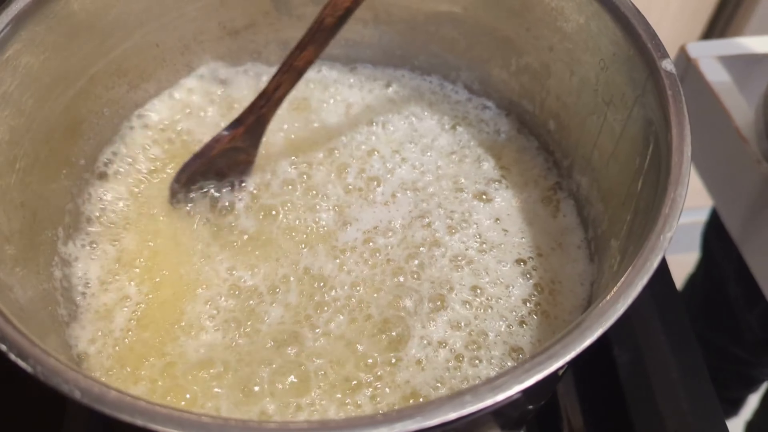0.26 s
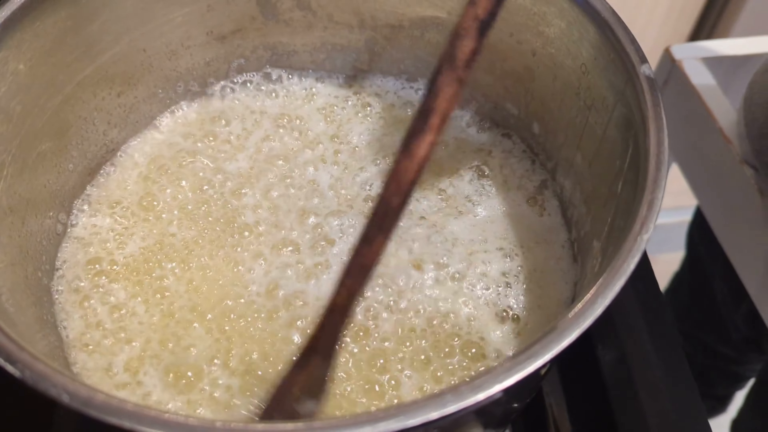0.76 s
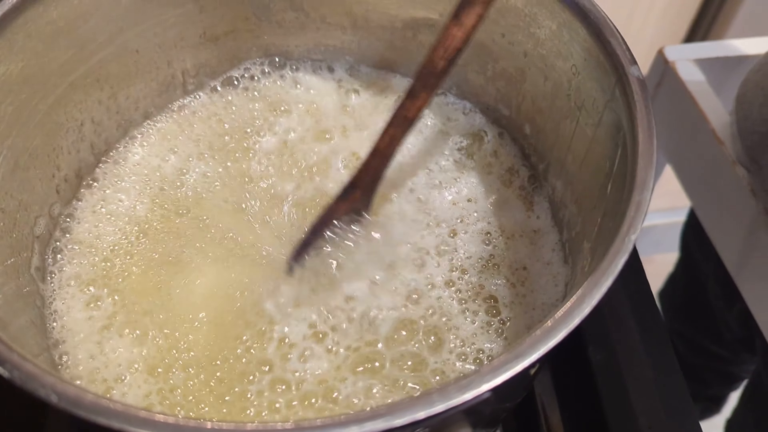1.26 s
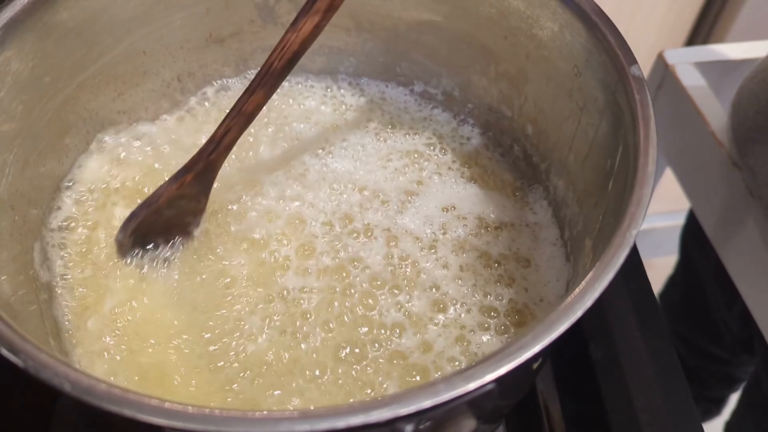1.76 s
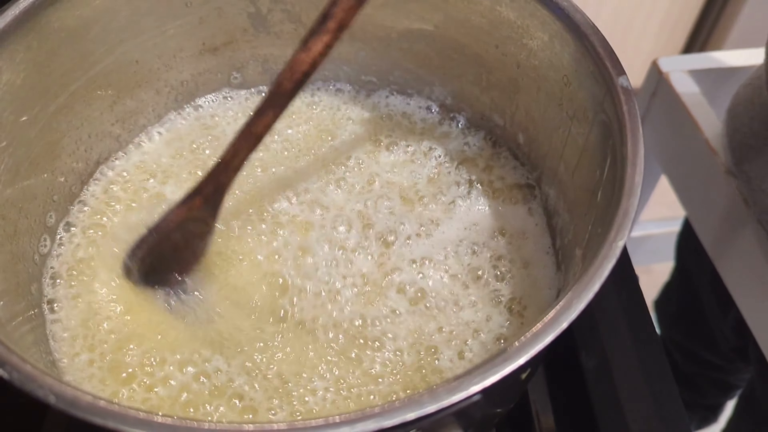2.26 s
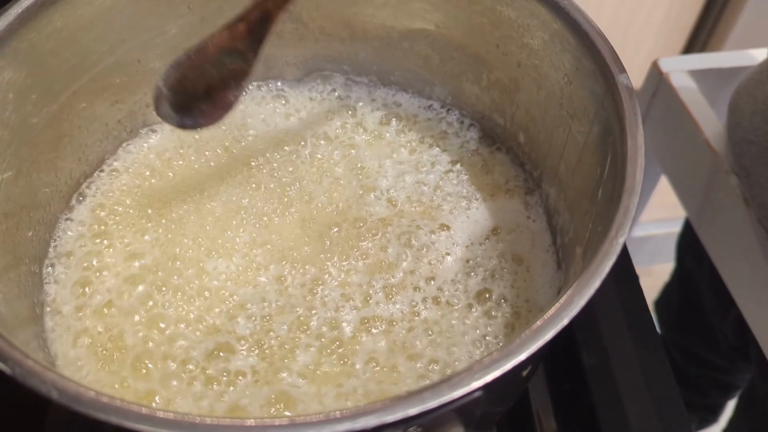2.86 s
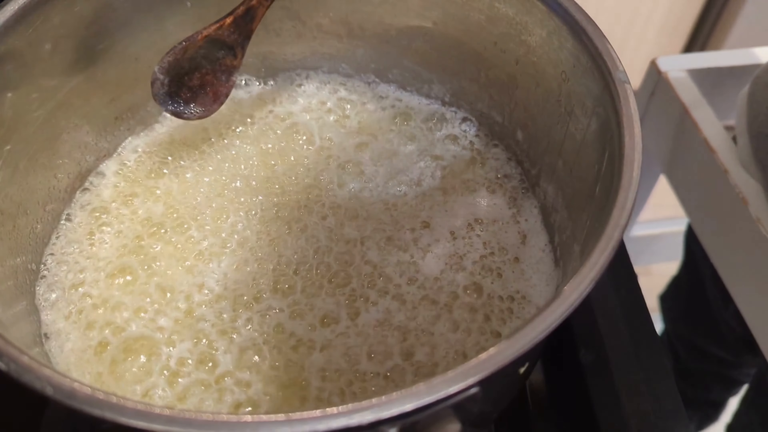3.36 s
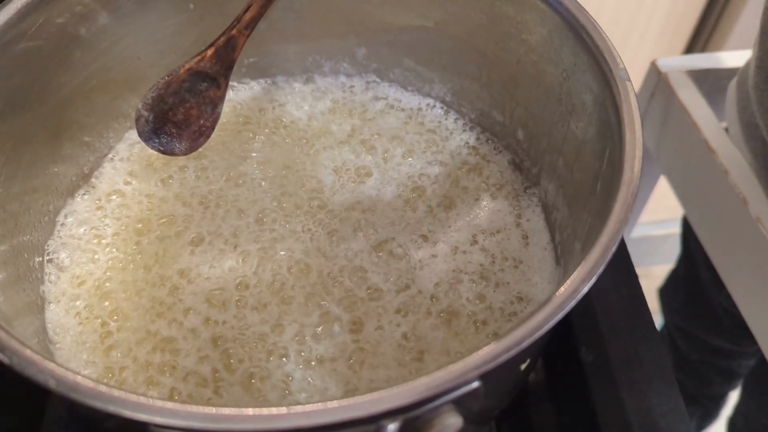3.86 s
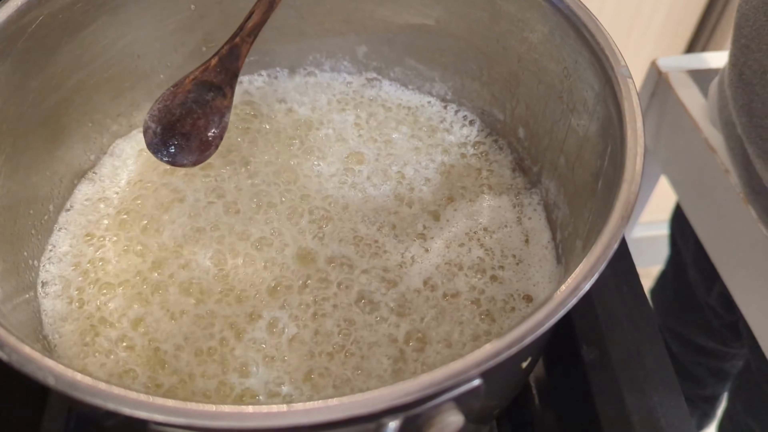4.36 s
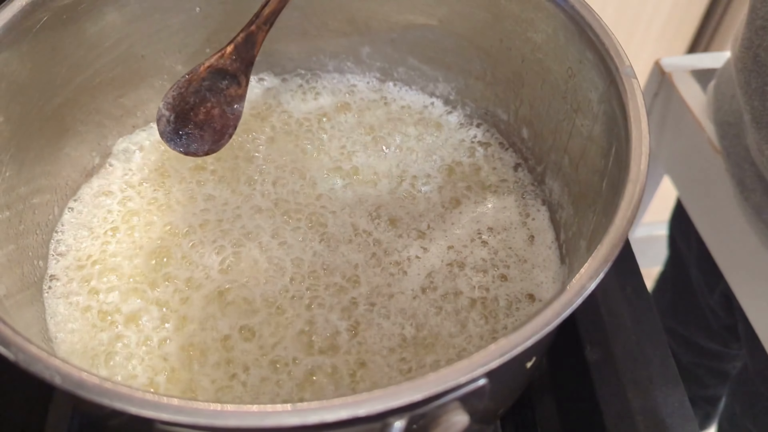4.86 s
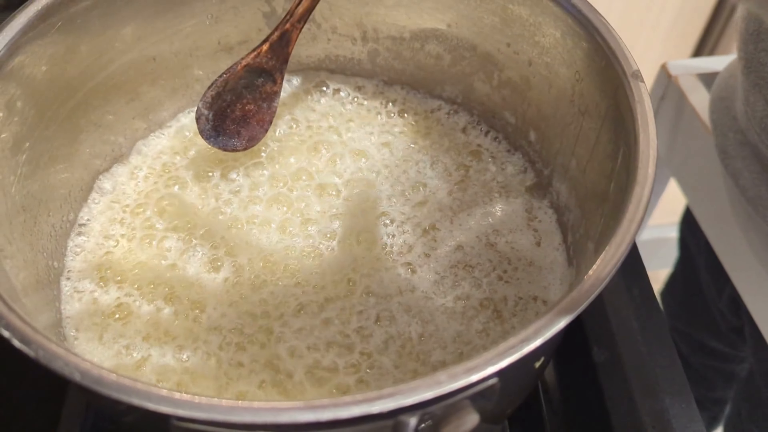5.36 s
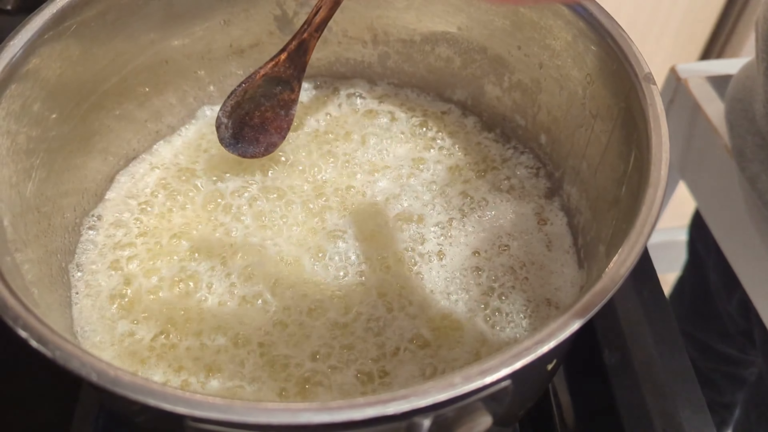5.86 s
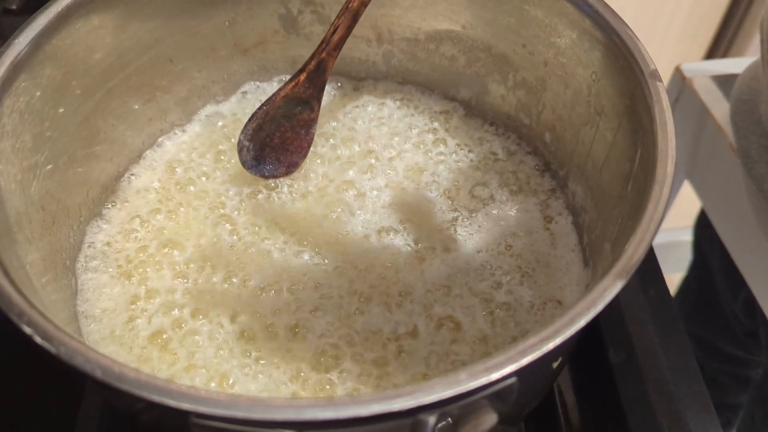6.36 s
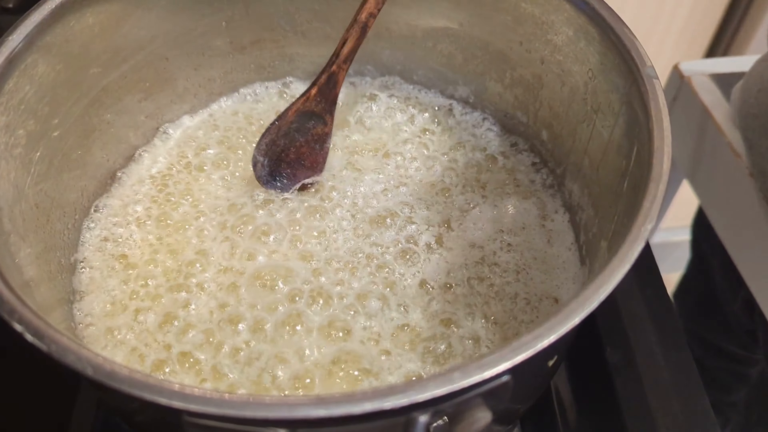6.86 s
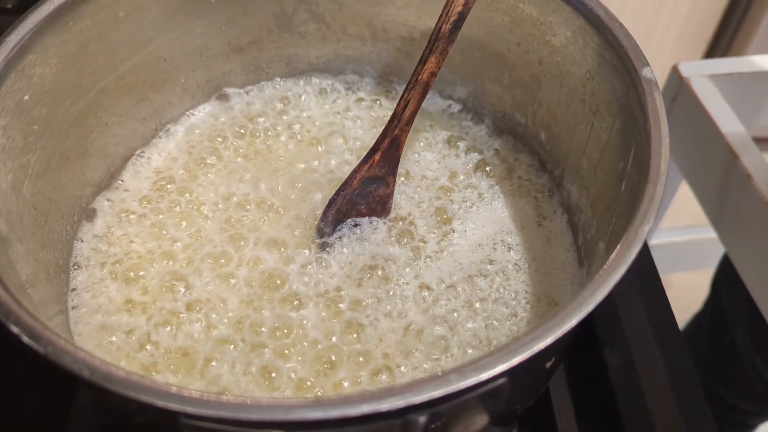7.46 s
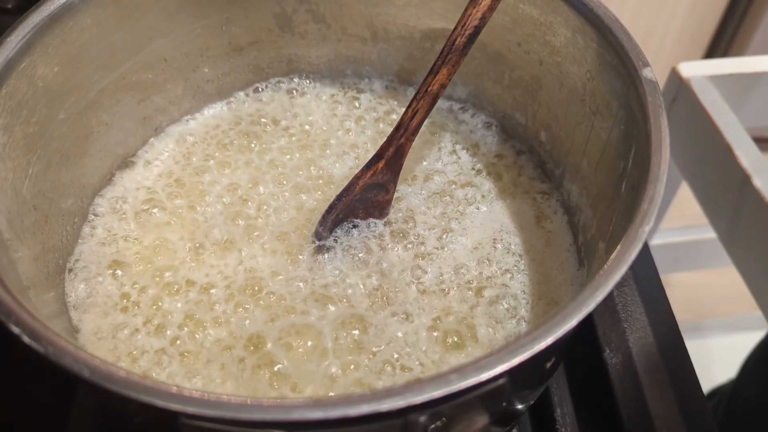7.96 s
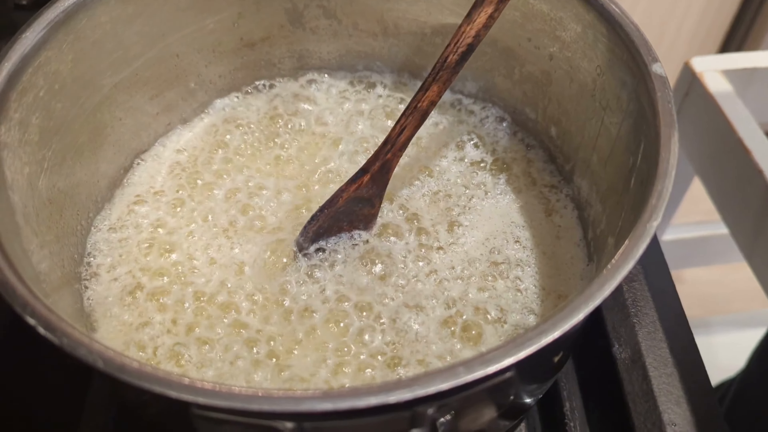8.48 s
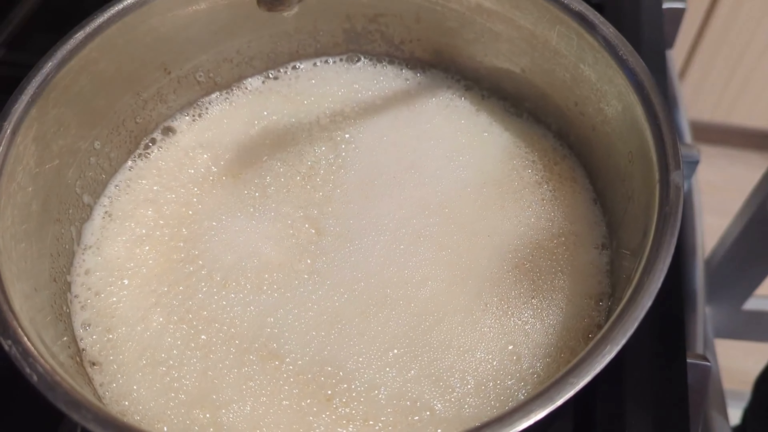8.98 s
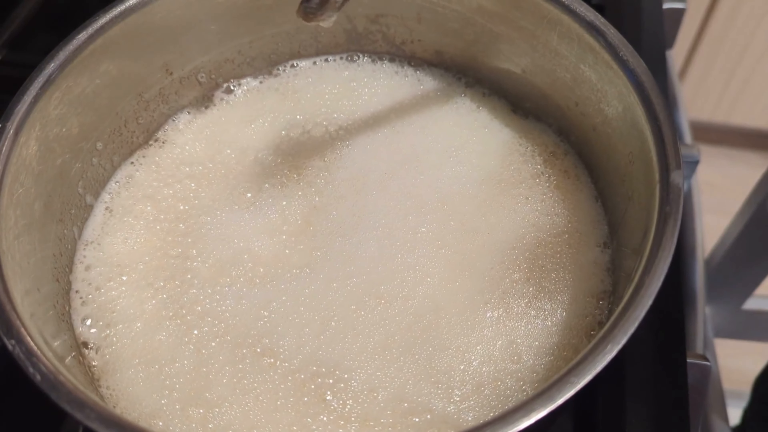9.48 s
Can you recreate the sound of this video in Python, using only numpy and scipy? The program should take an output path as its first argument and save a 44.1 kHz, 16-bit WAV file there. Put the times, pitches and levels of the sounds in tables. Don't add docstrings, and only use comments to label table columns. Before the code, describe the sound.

After a tiny silent start, boiling butter enters at once: a dense, bright sizzle of countless bursting bubbles, close above a deep steel pot that gives the mids a hollow ring. From 0 to 2.8 s spoon strokes make the hiss surge and splash, with sharp high snaps and wet bubble blips. Around 3.0 to 3.4 s come spits of hot fat and soft spoon knocks on metal. The rolling boil then continues fuller and bubblier, with a strong crackling spit at 4.15 s, scattered pops and plopping bubbles, and another dull knock at 7.6 s. Crackle thickens toward 8.6 s. Sound cuts nearly silent at 8.63 s, with a brief scrap, then resumes at 8.78 s as much quieter, soft foam fizz with fine ticks, a clearer one at 9.44 s and a small spit at 9.48 s. A low, slightly wavering extractor hum near 120 Hz and duct rumble underlie both scenes.

```python
import sys
import numpy as np
from scipy import signal
from scipy.fft import rfft, irfft
from scipy.io import wavfile
from scipy.ndimage import uniform_filter1d

SR = 44100
rng = np.random.default_rng(int(sys.argv[2]) if len(sys.argv) > 2 else 0)


def int16_out(signal):
    q = np.round(np.clip(np.atleast_2d(signal).T, -1, 1) * 32767)
    wavfile.write(sys.argv[1], SR, q.astype(np.int16))


def rack_gain(trim_db):
    fader = np.asarray(trim_db, float)
    return 10 ** (fader / 20)


N = 428644
T = np.arange(N) / SR
HZ = np.maximum(np.arange(N // 2 + 1) * SR / N, 1.)
CHANGE_S = 8.65
LEFT_RIGHT = np.array([[1], [-1]])

# time in seconds, boil of the large bubbles in dB, fine spray from the spoon in dB.
BOIL = [
    [(.07, -8, 6.5), (.25, -6.5, 6), (.5, -5.5, 9), (.9, -3.5, 5), (1.3, -5.5, 13), (1.55, -3, 9),
     (1.8, -6, 11.5), (2.2, 0, 2.5), (2.75, -3, 8), (3.2, 0.5, -1.5), (4.4, 0.5, -0.5), (5.5, 1, -2),
     (7.5, 1, -1), (8.64, 2, -1.5)],
    [(8.652, -23, 1.5), (8.85, -20, -7.5), (9.24, -17, -5.5), (9.72, -13, -8)],
]
BUBBLE_HZ = (750, 1900, 5500, 13000)
# frequency in Hz, level in dB per Hz.
SIZZLE = [(300, -9.5), (600, -13), (900, -16.5), (1150, -17), (1500, -4.5), (2500, -9), (3200, -9.5),
          (4200, -10.5), (5500, -16), (7000, -13), (8100, -17), (9000, -15), (13000, -13.5), (15800, -17.5)]
# frequency in Hz, width in Hz, level in dB.
POT_AIR = [(945, 18, 1.5), (1274, 55, 14.5), (1380, 18, -7), (1930, 67, 6), (2550, 740, -2),
           (3700, 100, -45.5)]
# frequency in Hz, level in dB per Hz.
FOAM = [(300, -6.5), (600, -13), (1000, -10.5), (1600, -8), (2500, -3.5), (3500, -10.5), (5000, -14.5),
        (7000, -11.5), (10000, -13), (13000, -10), (15500, -15)]


def butter():
    boil_db, spray_db = curves(BOIL)
    levels = np.outer((0.31, 0.93, 0.94, 0.85), boil_db) + np.outer((0.053, 0, 0.5, 0.92), spray_db)
    out = np.zeros((2, N))
    slow_surge = walk(11)
    crackle = walk(100)
    for hz in 350 * 2 ** np.arange(0, 5.7, 1 / 3):
        place = np.interp(np.log(hz), np.log(BUBBLE_HZ), np.arange(4))
        low = min(int(place), 2)
        small = np.clip(np.log2(hz / 1500) / 3, 0, 1)
        db = levels[low] + (place - low) * (levels[low + 1] - levels[low])
        db = db + surges(hz) + 0.6 * slow_surge
        db = db + (3.8 + .14 * spray_db) * small ** 3 * crackle
        db = db + (2.3 - 1.1 * small) * walk(35)
        burst = rng.random((2, N)) < hz * (.2 + .4 * small) / SR
        rarity = np.minimum(rng.exponential(size=(2, N)), 3.5)
        size = rack_gain((2.0 + 1.0 * small) * rarity) * rng.choice([-1., 1.], size=(2, N))
        rung = ring(ring(burst * size, hz, 0.32 * hz), hz, 0.37 * hz)
        out += rack_gain(db) * unit(rung) * np.sqrt(hz)
    out = np.where(T < CHANGE_S, colour(out, SIZZLE, POT_AIR), colour(out, FOAM, []))
    return ports(*unit(out)) * rack_gain(-36)


# time of the peak in seconds, change of level in dB,
# pitch in Hz, fade in seconds.
SURGES = [(4.17, 5, 900, .08), (8.55, 3, 4500, .1), (.14, 4.5, 2200, 0.025), (.3, 8.5, 750, 0.17),
          (.33, 11, 13300, 0.066), (1.05, 2.5, 9000, .08), (1.12, 3.5, 750, 0.25), (1.35, -1, 13000, 0.042),
          (1.43, 4, 900, 0.05), (1.78, 4.5, 2510, .1), (1.86, -1.5, 13000, 0.1), (2.18, 6.5, 1000, 0.07),
          (3.0, -6, 13000, .02), (3.06, 10.5, 4500, 0.1), (3.1, 4, 1200, 0.045), (3.26, 18, 7050, 0.066),
          (3.39, 8, 694, 0.097), (4.17, 19, 7600, 0.09), (4.19, 1, 2500, 0.087), (4.76, 5, 1900, .06),
          (4.91, 9, 550, .07), (5.14, 6, 800, 0.057), (6.28, 1.5, 11000, .04), (6.89, 4.5, 2000, 0.036),
          (7.605, 10, 600, .05), (7.67, 2, 2000, 0.017), (7.84, 3.5, 750, .06), (9.51, 5, 6000, .08),
          (1.28, 3, 2000, .07), (8.8, -3.5, 700, .4), (8.67, 13, 12000, .01), (9.7, 8, 1000, 0.084),
          (.34, 0, 11000, .06), (.42, 4, 11000, .03), (.5, 3, 12000, 0.14), (.46, -6, 10000, .02),
          (.83, -1, 11000, .03), (1.13, 3, 13000, 0.11), (1.3, 2.5, 13000, 0.053), (8.3, -3, 12000, .3),
          (5.65, 1.5, 1100, .2), (7.33, 3, 1500, 0.22), (5.14, 6, 400, .15), (.1, -3, 6000, 0.1),
          (1.55, -3, 12000, .15), (8.58, 1, 1100, .1), (3.05, 4, 9000, .06), (4.76, 2.5, 800, .08),
          (8.58, -3, 2200, .1), (5.4, 3, 11000, .1), (8.0, -2, 9000, .1), (4.3, -2, 2200, .1)]


def surges(hz):
    rise_s, octaves = 0.027, 0.86
    db = np.zeros(N)
    for s, peak_db, centre_hz, fade_s in SURGES:
        near = slice(int((s - .1) * SR), int((s + .6) * SR))
        age = T[near] - s
        fall = np.where(age < 0, (age / rise_s) ** 2, age / fade_s)
        db[near] += peak_db * np.exp(-(np.log2(hz / centre_hz) / octaves) ** 2 - fall)
    return db


# start in seconds, peak in dB, pitch in Hz.
POPS = [(.3109, -18, 13700), (.4126, -21, 13200), (.7953, -22, 8810), (1.0437, -19, 12500),
        (1.3844, -13, 13000), (1.6388, -22, 9460), (1.8803, -19, 13100), (2.1746, -17, 11200),
        (2.223, -14, 14900), (2.4934, -24, 13100), (2.5572, -21, 6900), (2.654, -18, 11200),
        (2.7932, -17, 12900), (2.984, -11, 15000), (4.326, -26, 10000), (3.8408, -24, 6870),
        (3.931, -19, 7950), (4.16, -22, 8840), (4.17, -15, 9000), (4.1733, -19, 7000), (4.198, -20, 8000),
        (1.054, -19, 8000), (.86, -28, 7000), (4.9994, -19.5, 8900), (5.7744, -17, 12800),
        (6.0408, -21, 12700), (6.2843, -20, 12500), (6.836, -23, 11800), (7.1588, -28, 7400),
        (5.659, -23, 9740), (7.8424, -18, 9700), (7.935, -20, 11300), (8.0343, -28, 11900),
        (8.171, -21, 13100), (8.4373, -14.5, 10800)]
# start in seconds, peak in dB, pitch in Hz.
TICKS = [(8.9201, -41, 12700), (8.9924, -40, 14400), (9.0388, -33, 13500), (9.0832, -34, 11700),
         (9.1305, -27, 9900), (8.9723, -47, 11300), (9.2897, -44, 8020), (9.3626, -44, 6030),
         (9.436, -20, 12630), (9.213, -44, 6000), (9.302, -42, 13000), (9.489, -38, 8000),
         (9.552, -42, 11000), (9.63, -42, 7000), (9.717, -40, 9000)]


def pops():
    low_hz, high_hz = 8400, 15000
    snaps = [(s, db, low_hz + draw * (high_hz - low_hz))
             for s, db, draw in chance_bursts(per_s=90, db=-32.5, spray_share=0.78)]
    out, t = np.zeros(N + 4096), T[:4096]
    for s, db, hz in POPS + TICKS + snaps:
        level = rack_gain(db + 1.2 - 60 * t * hz / 12.)
        out[int(s * SR):][:4096] += level * np.minimum(t * hz / 1.2, 1) * np.sin(2 * np.pi * hz * t)
    out = out[:N]
    echoes = np.array([pot_echo(.02), pot_echo(0.031)])
    return out + .45 * signal.fftconvolve(out[None], echoes, axes=1)[:, :N]


# start in seconds,
# peak in dB, pitch in Hz.
GULPS = [(0.1268, -33, 2340), (0.537, -38, 2340), (0.7637, -32, 2350), (0.8486, -36, 2380),
         (1.2336, -32, 1320), (1.3245, -32.5, 1434), (1.4313, -38, 2410), (1.5091, -38, 1970),
         (1.7597, -29, 2340), (1.9062, -33, 2440), (2.3343, -28, 2000), (2.4295, -28.5, 1910),
         (2.7299, -31.5, 1630), (2.878, -32, 1930), (2.9838, -35.5, 2490), (3.0368, -33, 1950),
         (3.366, -23, 1960), (3.4505, -36, 1215), (3.553, -31, 2390), (3.832, -34, 1900),
         (4.3352, -30.5, 2200), (4.4749, -33.5, 2350), (4.5477, -30, 1680), (4.7458, -25, 1275),
         (5.0887, -32.5, 1254), (5.2666, -34.5, 1270), (5.4417, -30, 1994), (5.592, -34, 1280),
         (5.743, -37, 1320), (6.3691, -34, 1280), (6.4744, -29.5, 1930), (6.666, -31.5, 1900),
         (6.6874, -27, 1440), (6.7806, -30, 1930), (6.8919, -27, 2120), (7.269, -29, 2420),
         (7.3164, -32, 2500), (7.3405, -31, 2340), (7.416, -30, 1270), (7.4626, -30, 1920),
         (7.4975, -31, 2100), (7.6606, -30.5, 1856), (7.9101, -33, 1800), (8.251, -30, 1920),
         (8.353, -32, 1930), (8.394, -29, 2450), (8.4808, -31, 1300), (8.556, -34, 2280),
         (8.5885, -31, 2340),
         (.085, -35.5, 2420), (1.151, -32, 1660), (1.166, -35, 1490), (1.244, -35, 1390),
        (1.2565, -32, 1900), (1.277, -37, 1930), (1.288, -38, 1900), (1.303, -34, 1850),
        (1.319, -33.5, 2460), (1.4, -37, 2350), (1.51, -34, 1690), (6.896, -29, 1660), (7.672, -31, 2300),
         (1.775, -31, 2400), (1.787, -33, 2420), (1.44, -35, 2420), (1.455, -35, 2400),
            (1.655, -34, 2350), (3.07, -33, 2700), (3.11, -33, 1950), (3.127, -31, 2250), (3.12, -34, 1300),
            (4.165, -31, 2300), (4.175, -31, 2200), (4.182, -29, 1240), (4.19, -30, 2550),
            (4.158, -31, 3250), (4.173, -31, 3700), (4.25, -33, 1900), (6.956, -33, 2050),
            (7.146, -32, 1940), (7.19, -33, 2390), (7.234, -32, 2360), (7.408, -29, 1850),
            (7.41, -33, 2600), (7.54, -33, 2310), (7.672, -30, 1850), (7.744, -33, 2430),
            (7.845, -34, 1950), (7.972, -30, 1280), (8.148, -34, 1930), (8.157, -33, 1950),
            (8.184, -35, 1790), (8.292, -33, 2150), (8.392, -29, 1710), (8.432, -30, 2480),
            (8.537, -34, 1900), (8.556, -31, 1920), (8.575, -30, 1280)]


def gulps():
    blips = [(s, db, POT_AIR[(1, 3, 4)[int(3 * draw)]][0])
             for s, db, draw in chance_bursts(per_s=3, db=-43, spray_share=.01) if s < CHANGE_S]
    rows = GULPS + blips
    return in_pot(notes(rows, gain_db=-6, rise_s=.004, t60=.058, rough=.6, glide_per_s=.6, bass=.1))


# start in seconds, peak in dB, pitch in Hz.
KNOCKS = [(3.047, -35, 960), (3.062, -39, 960), (3.1, -35, 660), (3.366, -29, 1270), (3.366, -34, 2280),
          (3.372, -32, 430), (3.41, -34, 425), (3.44, -39, 410), (3.367, -39, 770), (3.425, -40, 750),
          (3.427, -40, 1280), (7.589, -33, 400), (7.589, -28.5, 667), (7.6, -35, 969)]


def knocks():
    return in_pot(notes(KNOCKS, gain_db=-2.5, rise_s=.003, t60=0.06, rough=0.3, glide_per_s=0, bass=.8))


def notes(rows, gain_db, rise_s, t60, rough, glide_per_s, bass):
    out, t = np.zeros(N + 4096), T[:4096]
    for s, db, hz in rows:
        wobble = rough * unit(ring(ring(rng.standard_normal(4096), hz, 340), hz, 340))
        tone = wobble + np.sin(2 * np.pi * hz * t * (1 + glide_per_s * t))
        fall_db = 60 * np.maximum(t - rise_s, 0) / t60 * (hz / 1000) ** bass
        out[int(s * SR):][:4096] += rack_gain(db + gain_db - fall_db) * np.minimum(t / rise_s, 1) * tone
    return out[:N]


def in_pot(x):
    return x + 0.9 * signal.fftconvolve(x, pot_echo(0.037))[:N] * LEFT_RIGHT


def pot_echo(t60):
    echo = rng.standard_normal(4096) * rack_gain(-60 * T[:4096] / t60)
    return echo / np.sqrt(np.sum(echo ** 2))


def chance_bursts(per_s, db, spray_share):
    place, size, draw = rng.random((int(per_s * N / SR), 3)).T
    boil_db, spray_db = (c[(place * N).astype(int)] for c in curves(BOIL))
    peak_db = db + boil_db + spray_share * spray_db - 3 * np.log(size + .02)
    return zip(place * N / SR, peak_db, draw)


# start in seconds, level in dB, time to fall 60 dB in seconds, lowest and highest Hz.
SPITS = [(1.15, -45, .1, 1400, 2200), (1.23, -46.5, 0.18, 60, 400), (2.09, -44.5, 0.82, 506, 1600),
         (3.035, -37, 0.93, 800, 8200), (3.075, -38, .6, 500, 3500), (3.235, -29.5, 0.56, 3000, 12800),
         (3.385, -41, 0.22, 250, 1100), (4.15, -30, 0.55, 2400, 11000), (4.152, -40, .5, 700, 3200),
         (4.147, -29.5, 0.31, 6000, 12500), (4.19, -49, 0.18, 150, 400), (7.585, -35.5, 0.14, 300, 1200),
         (9.483, -42.5, 0.31, 3200, 14000)]


def spits():
    out = np.zeros((2, N))
    for s, db, t60, low_hz, high_hz in SPITS:
        age = np.maximum(T - s, 0)
        noise = rng.standard_normal((2, N)) * rack_gain(3.0 * walk(150))
        middle_hz = np.sqrt(low_hz * high_hz)
        for band, share in ((low_hz, middle_hz), 1.), ((middle_hz, high_hz), .6):
            hiss = signal.sosfilt(signal.butter(2, band, "band", fs=SR, output="sos"), noise)
            out += rack_gain(db - 60 * age / (t60 * share)) * np.minimum(age / 0.01, 1) * unit(hiss)
    return ports(*out)


# time in seconds, hum level in dB.
FAN = [
    [(0.07, -37), (0.11, -37.5), (0.28, -35), (0.57, -39), (0.71, -36.5), (1.21, -37.5), (1.28, -36),
     (7.97, -35), (8.14, -35), (8.43, -35.5), (8.6, -34.5), (8.62, -35.5)],
    [(8.785, -38.5), (8.847, -36.5), (9.275, -39), (9.591, -37.5), (9.72, -36)],
]
# frequency in Hz, level in dB, left minus right in dB, left lead in radians.
HUM = [(120, 1.5, 4.5, 0.29), (240.2, -19, -1, .2), (359.4, -15, -0.5, 0.82)]
# frequency in Hz, level in dB per Hz.
FAN_AIR = [(12, -80.5), (20, -43), (43, -14), (85, -13.5), (101, -11), (122, -13), (151, -14.5),
           (360, -16.5), (454, -20.5), (509, -18.5), (2000, -76.5), (2600, -99), (4400, -120)]
# frequency in Hz, width in Hz, level in dB.
DUCT = [(57, 23, -4), (159, 5.7, 4), (273.8, 11.5, 10.5)]


def fan():
    hum_db, = curves(FAN)
    hum = 0
    for hz, db, pan_db, lead in HUM:
        phase = 2 * np.pi * hz * T + 0.16 * walk(6.7) + lead * LEFT_RIGHT / 2
        level = rack_gain(db + 0.7 * walk(9.2) + pan_db * LEFT_RIGHT / 2)
        hum = hum + level * np.sqrt(2) * np.sin(phase)
    air = unit(colour(rng.standard_normal((2, N)), FAN_AIR, DUCT))
    air_db = hum_db - 7.5 + walk(15)
    return rack_gain(hum_db) * hum + rack_gain(air_db) * ports(*air)


def curves(shots):
    s, *columns = np.vstack(shots).T
    return [np.interp(T, s, c) for c in columns]


def over_hz(table):
    hz, value = np.transpose(table)
    return np.interp(np.log(HZ), np.log(np.maximum(hz, 1.)), value)


def unit(x):
    return x / np.sqrt(np.mean(x ** 2))


def ring(x, hz, width):
    return signal.lfilter(*signal.iirpeak(min(hz, .45 * SR), hz / width, fs=SR), x)


def colour(x, table, modes):
    rung = sum(rack_gain(db) * ring(x, hz, width) for hz, width, db in modes)
    return irfft(rfft(x + rung) * rack_gain(over_hz(table)), N)


def walk(rate):
    k = int(SR / rate)
    return 0.7 * uniform_filter1d(np.repeat(rng.standard_normal(N // k + 1), k)[:N], k)


# frequency in Hz, likeness from 0 to 1.
LIKENESS = [(60, .94), (130, .99), (200, .8), (290, .93), (600, .55), (850, .2), (1280, .75), (2200, .5),
            (3200, .25), (6200, .2), (8000, .25), (15000, .25)]
# frequency in Hz, lead in radians.
LEAD = [(100, -.2), (430, -.4), (800, .5), (1290, 2.), (1800, 3.1), (2330, 6.3), (3010, 9.5), (4000, 12.4),
        (6500, 4 * np.pi), (16000, 4 * np.pi)]
# frequency in Hz, left minus right in dB.
TILT = [(60, 2), (130, 1.5), (290, -1.5), (700, -0.5), (1290, 3.5), (2000, -0.5), (3600, 1), (5500, -5),
        (8000, 1.5), (15000, 1.5)]


def ports(shared, apart):
    like = np.clip(over_hz(LIKENESS), 0, 1)
    lagging = like * np.exp(-1j * over_hz(LEAD)) * rfft(shared)
    right = lagging + np.sqrt(1 - like ** 2) * rfft(apart)
    tilt = rack_gain(over_hz(TILT) / 2)
    return np.array([irfft(rfft(shared) * tilt, N), irfft(right / tilt, N)])


def scene():
    return butter() + pops() + gulps() + knocks() + spits() + fan()


# start in seconds, length in seconds.
WIDE = [(.07, .197), (.668, .174), (.923, .081), (1.341, .145), (2.937, .128), (3.291, .082), (3.529, .296),
        (5.085, .139), (5.567, .25), (5.915, .087), (6.2, .168), (6.803, .088), (7.03, .174), (7.61, .082),
        (8.121, .11), (8.922, .232), (9.259, .087)]


def mottle(x, from_hz, mono_hz, band_hz, spread_db, holes, strays):
    hz, frames, z = signal.stft(np.array([x[0] + x[1], x[0] - x[1]]) / 2, SR, nperseg=1024)
    shape = (int(SR / 2 / 300) + 1, len(frames) // 2 + 1)

    def spread(cells):
        return np.repeat(cells, 2, axis=1)[(hz / band_hz).astype(int), :len(frames)]

    busy = 1 + 1.5 * (frames[::2] < 1.6)
    gone = rng.random(shape)[:, :len(busy)] < holes * busy
    gone = gone | (np.roll(gone, 1, axis=1) & (rng.random(gone.shape) < .6))
    gone = gone | (np.roll(gone, 1, axis=0) & (rng.random(gone.shape) < .4))
    db = spread(spread_db * rng.standard_normal(shape)) * np.clip(hz / from_hz - 1, 0, 1)[:, None]
    db = db - 45 * spread(gone) * (hz[:, None] > 0.75 * mono_hz)
    wide = sum((frames >= s) & (frames < s + length) for s, length in WIDE) > 0
    edge_hz = mono_hz + 450 * np.repeat(rng.standard_normal(shape[1]), 2)[:len(frames)]
    near_10k = np.exp(-((hz[:, None] - 10200) / 500) ** 2)
    odds = strays * (1 + 18 * near_10k + 16 * (frames < 1.4))
    kept = wide | (hz[:, None] < edge_hz) | (spread(rng.random(shape)) < odds)
    z = z * rack_gain(db) * np.array([kept | True, kept])
    mid, side = signal.istft(z, SR, nperseg=1024)[1][:, :N]
    return np.array([mid + side, mid - side])


def top_cut(x):
    return signal.sosfilt(signal.butter(12, 16670, fs=SR, output="sos"), x)


# time in seconds, gain from 0 to 1.
EDIT = [(.062, 0), (.063, 0.37), (.085, 0.95), (8.6305, 0.99), (8.631, 0.07), (8.645, 0), (8.647, 0),
        (8.657, 0), (8.678, 0.65), (8.679, 0), (8.7, 0), (8.7795, 0), (8.7805, 0.7), (8.8, 0.98)]


def record(dry):
    heard = mottle(dry, from_hz=2600, mono_hz=6920, band_hz=340, spread_db=3.0, holes=0.011, strays=0.023)
    steep_top = signal.ellip(10, .3, 70, 15660, fs=SR, output="sos")
    heard = signal.sosfilt(steep_top, heard)
    return top_cut(heard * np.interp(T, *np.transpose(EDIT)))


dry = scene()
out = record(dry)
int16_out(out)
```